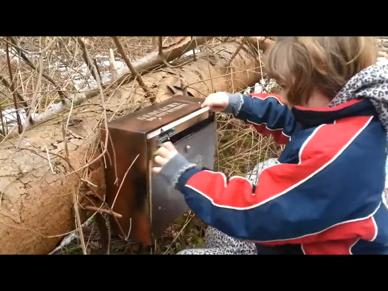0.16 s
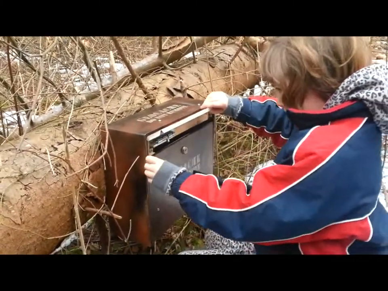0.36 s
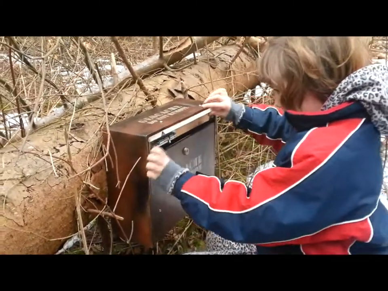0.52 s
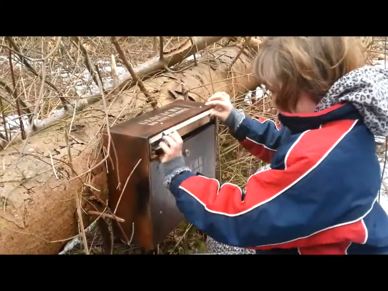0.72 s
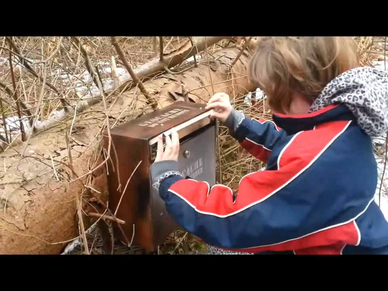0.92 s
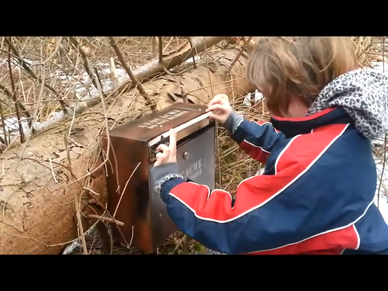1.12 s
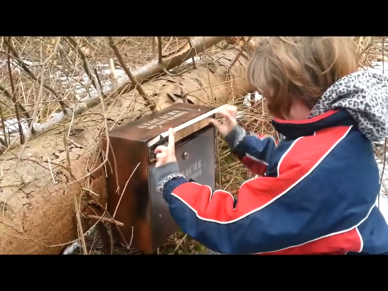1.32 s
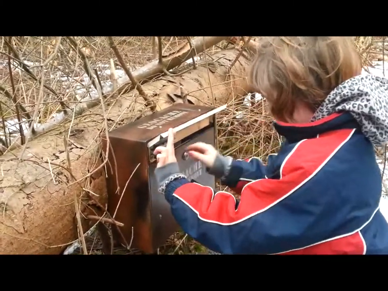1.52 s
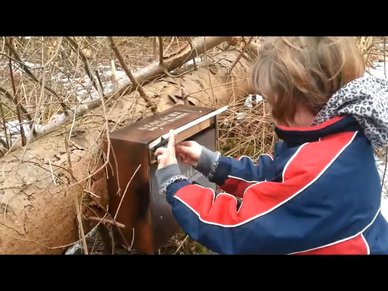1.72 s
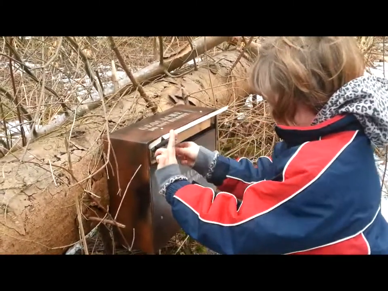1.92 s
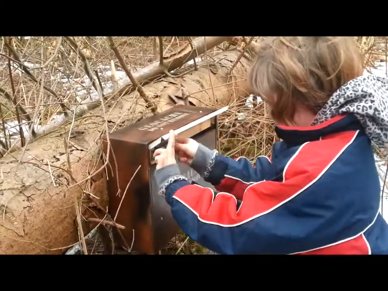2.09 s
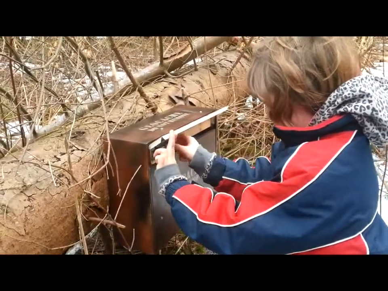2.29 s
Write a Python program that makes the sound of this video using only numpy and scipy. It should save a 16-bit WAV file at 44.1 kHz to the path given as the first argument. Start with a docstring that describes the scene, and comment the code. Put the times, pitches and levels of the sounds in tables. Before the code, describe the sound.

A small metal door swings shut with a short scrape and a clattering clank, to the right of the microphone. Soft hollow knocks follow, then two quick bursts of latch clicks, outdoors in quiet woods.

```python
"""A short scrape swells into a rattling clack: a sheet-metal letterbox door swings shut, off to the right.
The scrape is a run of tiny slips; the door then bounces on its frame and sets the box ringing.
Fingers knock and fiddle at the latch, which snaps over in two short bursts of clicks.
Each contact is a crack, a noisy wash of dense metal modes and a few clear ringing ones.
The trunks scatter back a faint tail, and the quiet wood hushes steadily underneath."""
import sys
import numpy as np
from scipy import signal
from scipy.fft import rfft, irfft
from scipy.io import wavfile

SR = 44100
rng = np.random.default_rng(int(sys.argv[2]) if len(sys.argv) > 2 else 0)


def output_pcm(signal):
    """Save a mono or channel-first signal as 16-bit PCM at the path in sys.argv[1].

    Samples are clipped to [-1, 1] before scaling.
    """
    pcm = np.clip(np.atleast_2d(signal).T, -1, 1) * 32767
    wavfile.write(sys.argv[1], SR, np.round(pcm).astype(np.int16))


N = 103635
HARDNESS_HZ = 1630  # a harder contact brightens the sound from about here up

# where the door sits in the stereo image: pitch_hz, left_over_right_db
DOOR_PAN = [(60, 6), (120, -0.5), (260, -1.5), (540, -5.0), (1130, -8.5), (2350, -13), (4900, -9.5),
            (10200, -9)]
# how far the left ear leads the right for the whole box: pitch_hz, lead_rad
LEFT_LEAD = [(60, -.2), (200, -.45), (500, -1), (1100, -1.6), (2000, -2.5), (2500, -2.4), (3200, -.2),
             (5000, 0)]
# how alike both ears hear latch and knocks: pitch_hz, correlation
SHUT_BOX_LIKENESS = [(100, 1), (300, 0.75), (800, 0.66), (1300, 0.29), (3000, 0.14), (5000, 0.94),
                     (7000, 1)]


def door():
    """The door scrapes in and rattles against the frame; its sheet and the box panels ring."""
    # bounces on the frame: start_s, level_db, treble_db
    bounces = [(.1935, -13.5, 0), (.256, -5.5, 2), (.2635, 1.5, -1.5), (.2705, 1.5, 3), (.2785, -0.5, 6.5),
               (.2865, 0, -8), (.306, -7, -2.5), (.414, -21.5, -17)]
    # ringing of the box panels: pitch_hz, level_db, t60_s
    box_modes = [(125, -12, .3), (151, -12, .65), (172, -10, .4), (209, -7, .42), (228, -6, .37),
                 (287, -11, .4), (355, -11, .3), (377.5, -2, .44), (453, -7, .3), (502, 1, .3),
                 (550, -11, .28), (631, -13, .28), (742, -5, .24), (1060, -14, .3), (1102, -13, .25)]
    # ringing of the thin door sheet: pitch_hz, level_db, t60_s
    sheet_modes = [(1340, 2, .2), (1402, 1, .2), (1475, -1, .2), (1538, 0, .22), (1694, -2, .18),
                   (2335, 0, .16), (2610, -4, .12), (3427, -1, .17), (3731, -2, .14), (3875, -4, .14),
                   (3958, -1, .16), (4173, -4, .18), (5000, -3, .12), (5087, -4, .11)]
    # tone of the wash of weaker modes: pitch_hz, density_db
    colour = [(24, -77), (40, -44), (188, -11), (367, -10.5), (508, -3), (611, -21.5), (735, -5.5),
              (926, -5.5), (1250, -14.5), (2560, -17), (2810, -14.5), (3880, -18.5), (6750, -31),
              (9120, -28.5), (10000, -34.5), (13000, -75), (22000, -120)]
    # ring time of the wash: pitch_hz, t60_s
    decay = [(100, 0.26), (200, 0.43), (500, 0.31), (1200, .2), (3500, 0.15), (8000, 0.028)]
    # how alike both ears hear the wash: pitch_hz, correlation
    likeness = [(60, 0.66), (150, 1), (800, 0.91), (1400, 0.32), (2400, .4), (3500, 1), (10000, 1)]
    contacts = np.vstack([bounces, slips()])
    scrape = low_cut(clatter(slips(), colour, decay, likeness, crack_db=-2), hz=131, order=3)
    clack = clatter(bounces, colour, decay, likeness, crack_db=-0.5)
    wash = from_db(-23) * sheet_clang(scrape + clack)
    panels = from_db(-29) * ringing(contacts, box_modes)
    sheet = from_db(-42.5) * ringing(contacts, sheet_modes)
    return placed(wash + panels + sheet, DOOR_PAN, LEFT_LEAD)


def slips():
    """The scrape is a run of small, dull, uneven contacts: rows of start_s, level_db, treble_db."""
    # force of the scrape as the door swings in: time_s, force_db
    swing = [(.0, -24), (0.101, -22), (.15, -8.5), (.185, -1), (.215, 0.5), (.24, -1.5), (.26, -5)]
    slips_per_s, spread_db, treble_db = 300, 1.5, -4.5
    time_s, force_db = np.transpose(swing)
    time_jitter, level_jitter = rng.standard_normal((200, 2)).T
    start_s = (np.arange(len(time_jitter)) + .5 * time_jitter) / slips_per_s
    level_db = -18.5 + np.interp(start_s, time_s, force_db) + spread_db * level_jitter
    contacts = np.column_stack([start_s, level_db, np.full(len(start_s), treble_db)])
    return contacts[start_s < time_s[-1]]


def latch():
    """The latch snaps over in hard clicks, carried by the door sheet."""
    # clicks of the latch: start_s, level_db, treble_db
    snaps = [(1.984, -16, -1), (1.9897, 0, 1.5), (1.9975, 2.5, 3.5), (2.0152, -3, 5), (2.0235, -11.5, 6),
             (2.0666, 0.5, 0), (2.092, -1, -2), (2.098, -1, -5.5), (2.165, -11.5, -11), (2.251, -23, -7),
             (2.317, -28, 3.5)]
    # ringing of the latch and its plate: pitch_hz, level_db, t60_s
    modes = [(482, -8, .3), (508, -9, .3), (779, -2, .3), (824, -6, .28), (981, 0, .3), (1450, -6, .25),
             (1539, -6, .3), (1815, 2, .22), (2358, -5, .16), (3232, -5, .2), (3273, -6, .16),
             (3691, -6, .2), (3956, 0, .16), (5376, -11, .17)]
    # tone of the wash of weaker modes: pitch_hz, density_db
    colour = [(53, -55), (90, -42.5), (198, -10), (236, -10), (490, -5.5), (633, -11.5), (787, -8),
              (958, -3), (1190, -11.5), (1840, -4), (2780, -11.5), (3190, -7.5), (4370, -8.5), (4730, -15),
              (10000, -30.5), (13000, -66), (22000, -120)]
    # ring time of the wash: pitch_hz, t60_s
    decay = [(200, 0.49), (900, 0.4), (3500, 0.22), (8000, 0.15)]
    # where the latch sits: pitch_hz, left_over_right_db
    pan = [(60, 8), (120, -19), (260, 1), (540, -2.5), (1130, -7), (2350, -14), (4900, -13.5), (10200, -9)]
    wash = from_db(-33.5) * sheet_clang(clatter(snaps, colour, decay, SHUT_BOX_LIKENESS, crack_db=3.5))
    plate = from_db(-40) * ringing(snaps, modes)
    return placed(wash + plate, pan, LEFT_LEAD)


def knocks():
    """Fingers draw soft, hollow bumps from the shut door."""
    # fingers knocking and fiddling: start_s, level_db, treble_db
    taps = [(.6977, -11, 8), (.7182, 1.5, -8), (.727, 1.5, -9.5), (.7586, -4.5, 2), (.834, 1, -9.5),
            (.843, -7, 10.5), (.876, -8.5, 3), (.9172, -15, 5), (.98, -19.5, -1), (1.052, -19, 7),
            (1.0624, -9, 9.5), (1.08, -14.5, -30), (1.5029, -17, -5), (1.59, -10.5, -2), (1.612, -10, -1)]
    # ringing of the shut door under a finger: pitch_hz, level_db, t60_s
    modes = [(204.8, -5, 0.42), (296.6, -6, 0.23), (423, 0.5, 0.083), (562, -2.5, 0.16), (768, 2, 0.3),
             (816, -10, .22), (1000, -5.5, .2), (1740, -6, 0.25)]
    # tone of the wash of weaker modes: pitch_hz, density_db
    colour = [(53, -49), (90, -34.5), (198, -12), (685, -5), (756, -6), (1190, -12), (1730, -14),
              (1910, -17), (2470, -13), (2830, -10), (10000, -43.5), (13000, -69), (22000, -120)]
    # ring time of the wash: pitch_hz, t60_s
    decay = [(200, 0.43), (900, 0.17), (3500, 0.13), (8000, .09)]
    wash = from_db(-38.5) * sheet_clang(clatter(taps, colour, decay, SHUT_BOX_LIKENESS, crack_db=-7))
    body = from_db(-45.5) * ringing(taps, modes)
    return placed(wash + body, DOOR_PAN, LEFT_LEAD)


def ringing(hits, modes, spread_db=2):
    """Every contact strikes every mode with its own strength and sign; each mode keeps its energy share."""
    start_s, hit_db, treble_db = np.transpose(hits)
    level_jitter, polarity = rng.standard_normal((len(start_s), 2, len(modes))).transpose(1, 2, 0)
    rings = 0
    for k, (hz, mode_db, t60_s) in enumerate(modes):
        strike_db = hit_db + mode_db + treble_db * treble_share(hz) + spread_db * level_jitter[k]
        strikes = from_db(strike_db) * np.sign(polarity[k])
        radius, angle = from_db(-60 / (t60_s * SR)), 2 * np.pi * hz / SR
        feedback = [1, -2 * radius * np.cos(angle), radius ** 2]
        ring = signal.lfilter([0, np.sin(angle)], feedback, impulses(start_s, strikes))
        energy = np.sum(strikes ** 2) / (2 * (1 - radius ** 2))
        rings = rings + ring * np.sqrt(energy / np.sum(ring ** 2))
    return low_cut(rings, hz=91.1, order=4)


def clatter(hits, colour, decay, likeness, crack_db):
    """Each contact gives a crack, a wash of dense sheet-metal modes and a faint tail among the trees."""
    start_s, level_db, treble_db = np.transpose(hits)
    bands = 0
    for hz, band in noise_bands(colour, likeness):
        power = impulses(start_s, from_db(level_db + treble_db * treble_share(hz)) ** 2)
        crack = from_db(crack_db) ** 2 * np.minimum(treble_share(2 * hz), 1) * dying(power, t60_s=0.025)
        wash = dying(power, at_hz(decay, hz))
        trunk_scatter = from_db(-25.5) ** 2 * dying(power, t60_s=0.48)
        bands = bands + band * np.sqrt(crack + wash + trunk_scatter)
    return hollowed(bands)


def sheet_clang(x):
    """The treble of a contact gathers in the sheet's broad resonances and sinks between them."""
    # quickly damped resonances of the door sheet: pitch_hz, width_hz, lift_db
    resonances = [(1460, 150, 4), (1960, 80, 4), (2360, 90, 4), (2600, 100, 7), (3050, 70, 4),
                  (3420, 90, 7), (3800, 170, 5), (4170, 90, 7), (4640, 150, 5), (5040, 120, 7),
                  (5390, 80, 6), (6150, 250, 6), (8860, 100, 7), (9370, 120, 7)]
    dipped = x + (from_db(-3.5) - 1) * low_cut(x, HARDNESS_HZ, order=1)
    clang = 0
    for hz, width_hz, lift_db in resonances:
        peak = signal.lfilter(*signal.iirpeak(hz, hz / width_hz, fs=SR), dipped)
        clang = clang + (from_db(lift_db) - 1) * peak
    return dipped + clang


def hollowed(x):
    """Narrow gaps open between the groups of modes."""
    # where the metal hardly sounds: pitch_hz, width_hz
    gaps = [(2850, 130), (4430, 200), (4930, 70), (5210, 80), (5700, 140)]
    for hz, width_hz in gaps:
        x = signal.lfilter(*signal.iirnotch(hz, hz / width_hz, fs=SR), x)
    return x


def treble_share(hz):
    """How far a contact's hardness acts at this pitch: not at all in the bass, ever more higher up."""
    return np.log10(1 + (hz / HARDNESS_HZ) ** 2)


def impulses(start_s, sizes):
    """One single-sample kick for each contact."""
    return np.bincount((np.maximum(start_s, 0) * SR).astype(int), sizes, N)[:N] + 1e-18


def dying(power, t60_s):
    """Energy that is put in dies away exponentially."""
    return signal.lfilter([1], [1, -from_db(-120 / (t60_s * SR))], power)


def low_cut(x, hz, order):
    """Roll off the lows below the given pitch."""
    return signal.sosfilt(signal.butter(order, hz, "high", fs=SR, output="sos"), x)


def noise_bands(colour, likeness):
    """Third-octave bands of stereo noise as (centre_hz, band); together about rms 1."""
    edges = 22 * 2 ** (np.arange(28) / 3)
    centres = np.sqrt(edges[1:] * edges[:-1])
    gains = from_db(at_hz(colour, centres))
    gains = gains / np.sqrt(np.sum(gains ** 2 * np.diff(edges)) * 2 / SR)
    white = rng.standard_normal((2, 2, N))  # neighbouring bands take separate noise
    for k, hz in enumerate(centres):
        bandpass = signal.butter(3, edges[k:k + 2], "band", fs=SR, output="sos")
        mid, side = signal.sosfilt(bandpass, white[k % 2])
        alike = np.clip(at_hz(likeness, hz), -1, 1)
        stereo = np.sqrt((1 + alike) / 2) * mid + np.sqrt((1 - alike) / 2) * side * [[1], [-1]]
        yield hz, gains[k] * stereo


def placed(x, pan, lead=None):
    """Give each pitch its level and phase difference between the ears."""
    hz = np.arange(N + 1) * SR / (2 * N)
    ratio = from_db(at_hz(pan, hz))
    turn = 1 if lead is None else np.exp(1j * at_hz(lead, hz))
    ears = np.array([ratio * turn, np.ones(N + 1)]) * np.sqrt(2 / (1 + ratio ** 2))
    return irfft(rfft(x, 2 * N) * ears)[:, :N]


def from_db(db):
    """Decibels to gain."""
    return 10 ** (np.asarray(db) / 20)


def at_hz(points, hz):
    """Read a curve on a log-frequency axis."""
    pitch_hz, value = np.transpose(points)
    return np.interp(np.log(np.maximum(hz, 1)), np.log(pitch_hz), value)


def woodland_hush():
    """A smooth, distant outdoor bed with a little hiss."""
    # tone of the hush: pitch_hz, density_db
    colour = [(20, -22), (35, -23.5), (48, -9), (62, -3.5), (90, -7), (190, -1.5), (260, -2), (450, -4),
              (600, -0.5), (900, 0), (1150, -7), (1550, -7), (2200, -15.5), (3600, -16), (5000, -21.5),
              (6200, -25.5), (8000, -21), (10000, -21.5)]
    # how alike both ears hear it: pitch_hz, correlation
    likeness = [(60, 0.46), (140, 0.49), (330, -0.034), (780, 0.025), (1840, 0.012), (4330, 1),
                (10200, 0.99)]
    # which way it leans: pitch_hz, left_over_right_db
    pan = [(60, 2.5), (170, 7), (470, -4.0), (1310, -5.5), (3650, -3), (10200, -0.5)]
    hush = sum(band for _, band in noise_bands(colour, likeness))
    return from_db(-50.5) * placed(hush, pan)


def scene():
    """The letterbox, to the right, in the still wood."""
    return woodland_hush() + door() + knocks() + latch()


def record(dry):
    """A steep low-pass takes off the very top."""
    cutoff_hz = 10150
    return signal.sosfilt(signal.ellip(12, .1, 80, cutoff_hz, fs=SR, output="sos"), dry)


dry = scene()
out = record(dry)
output_pcm(out)
```